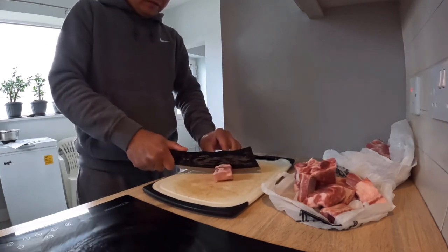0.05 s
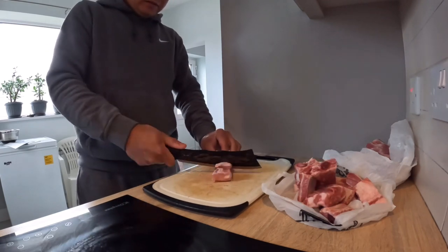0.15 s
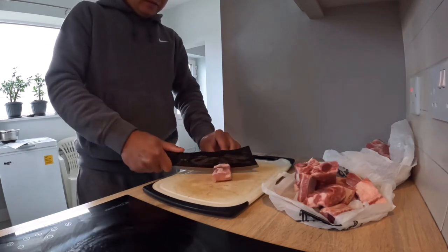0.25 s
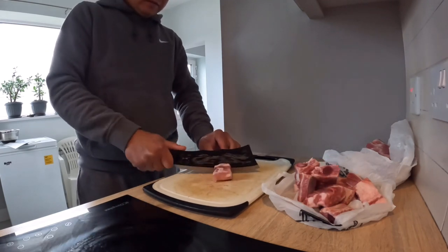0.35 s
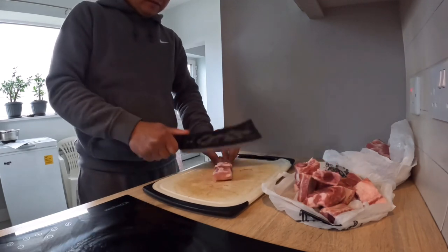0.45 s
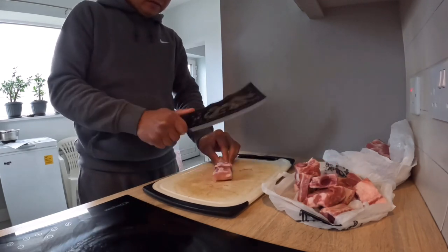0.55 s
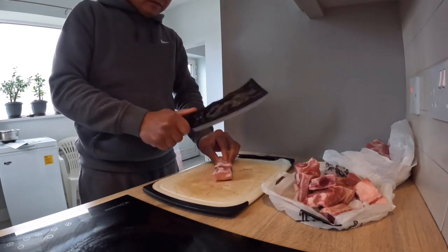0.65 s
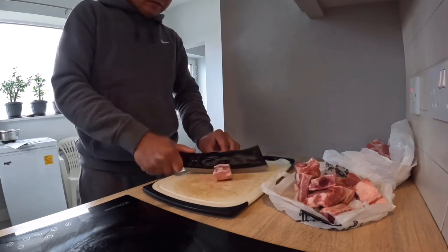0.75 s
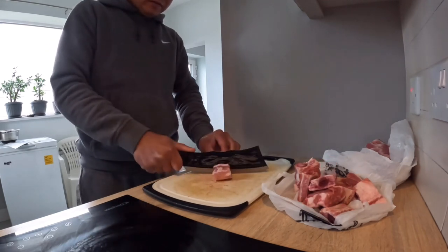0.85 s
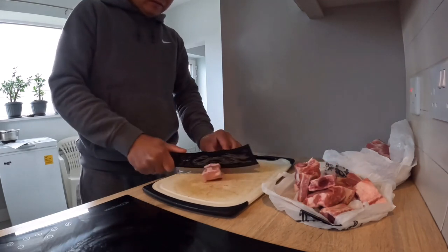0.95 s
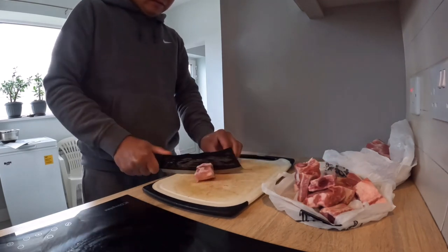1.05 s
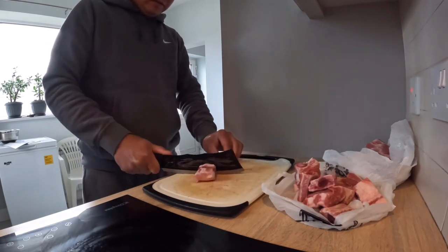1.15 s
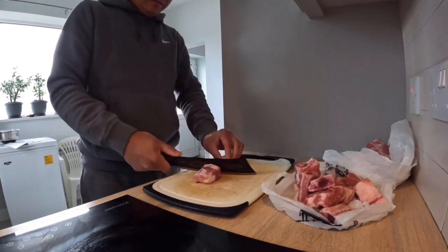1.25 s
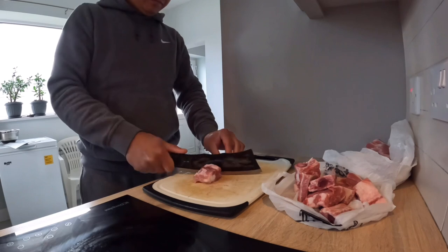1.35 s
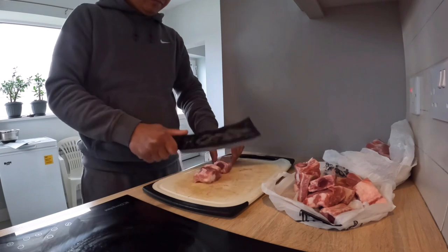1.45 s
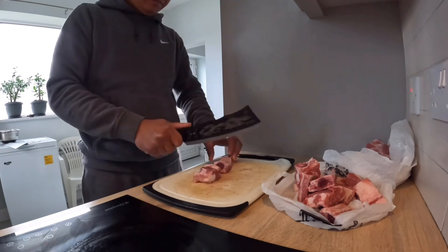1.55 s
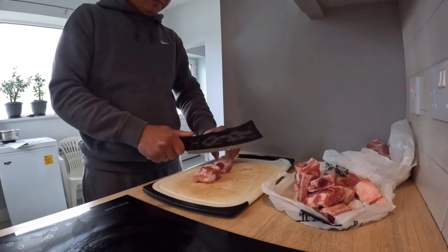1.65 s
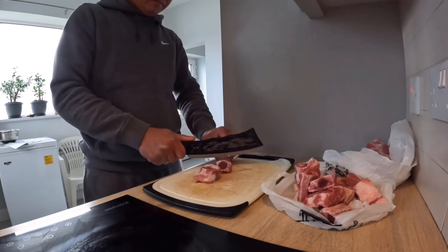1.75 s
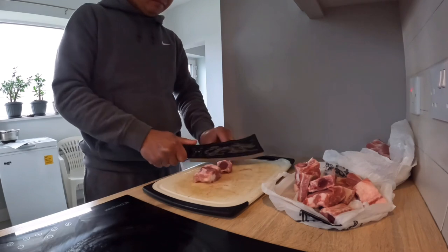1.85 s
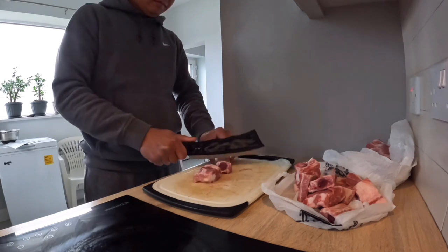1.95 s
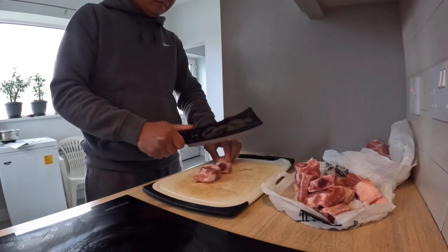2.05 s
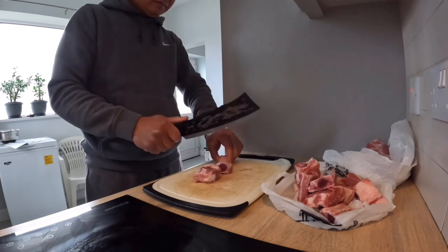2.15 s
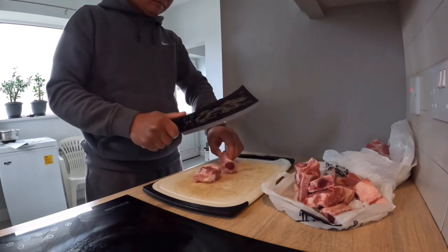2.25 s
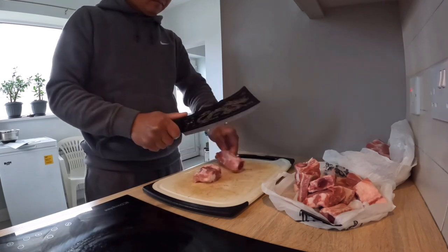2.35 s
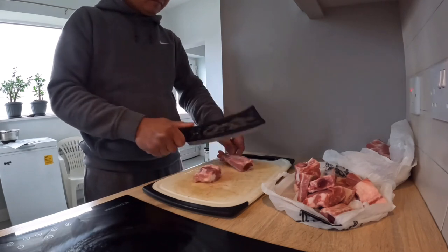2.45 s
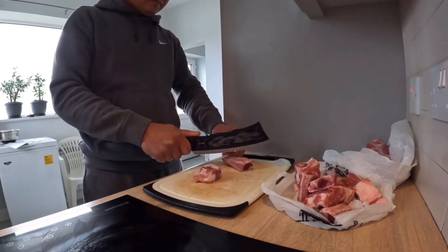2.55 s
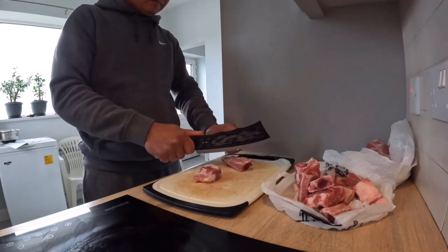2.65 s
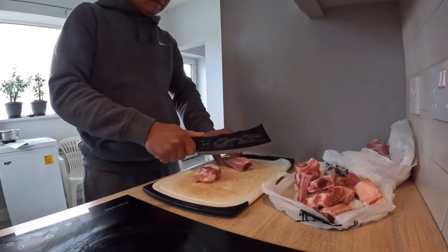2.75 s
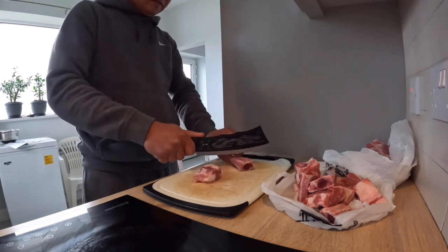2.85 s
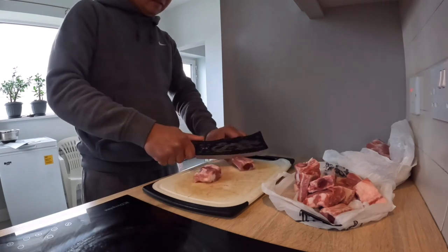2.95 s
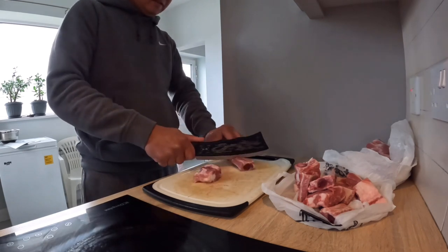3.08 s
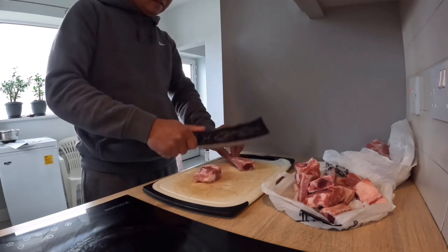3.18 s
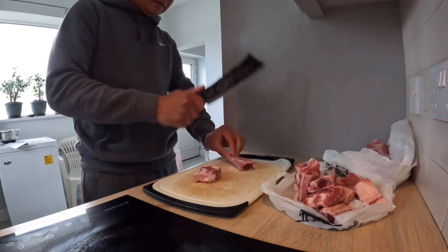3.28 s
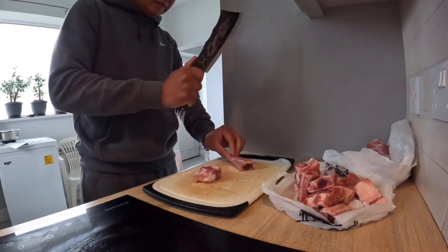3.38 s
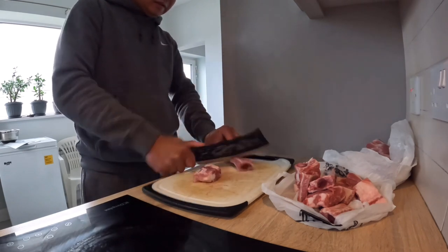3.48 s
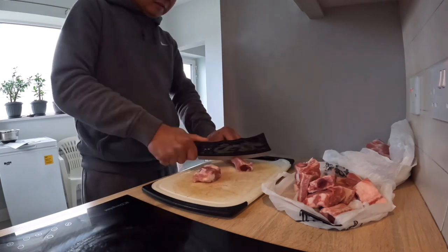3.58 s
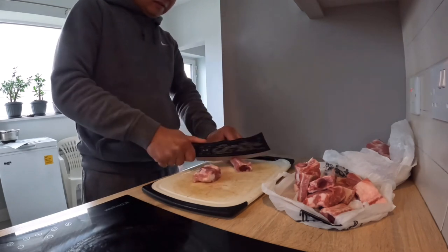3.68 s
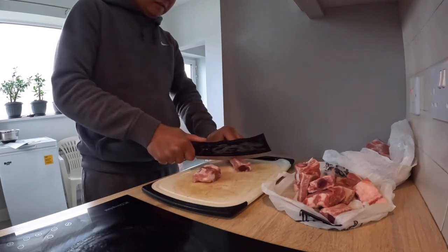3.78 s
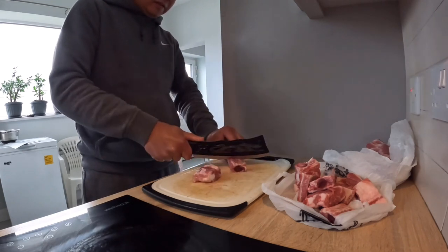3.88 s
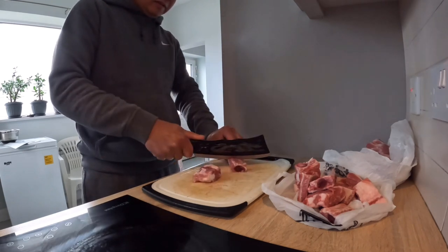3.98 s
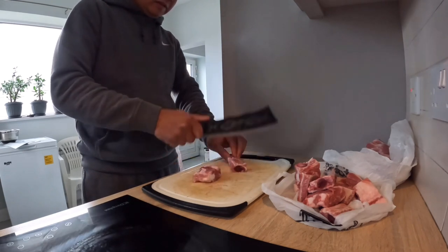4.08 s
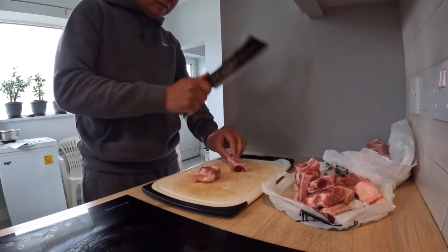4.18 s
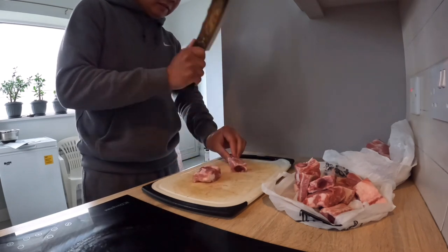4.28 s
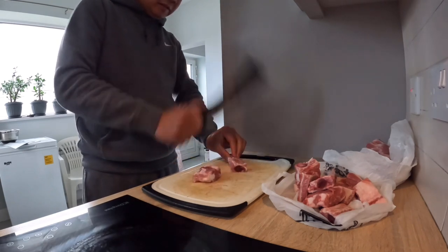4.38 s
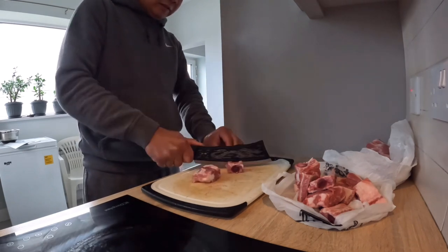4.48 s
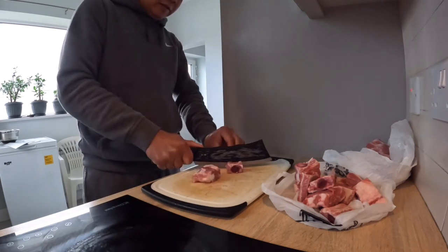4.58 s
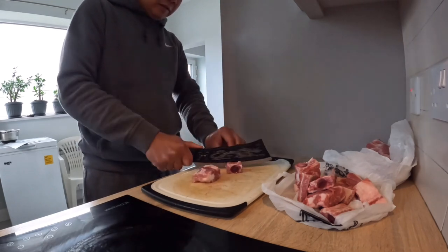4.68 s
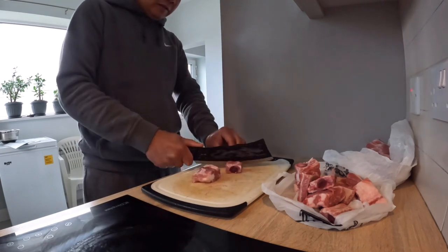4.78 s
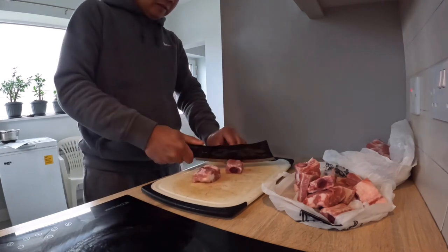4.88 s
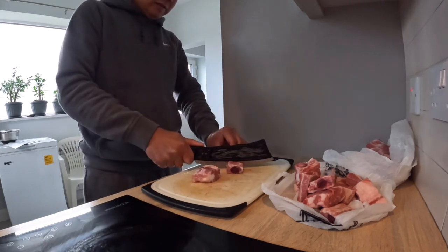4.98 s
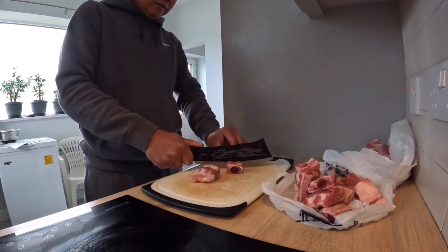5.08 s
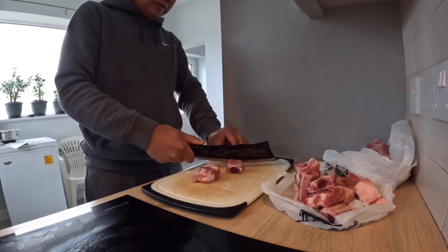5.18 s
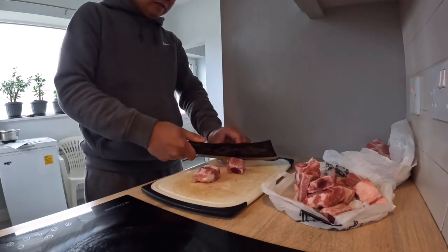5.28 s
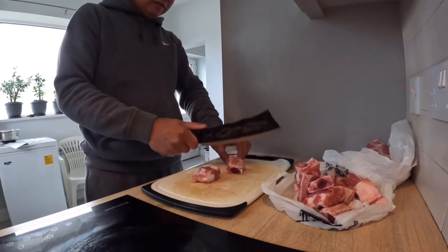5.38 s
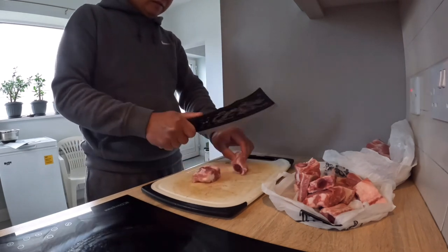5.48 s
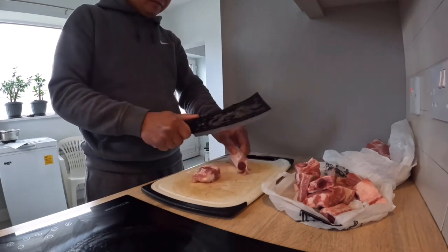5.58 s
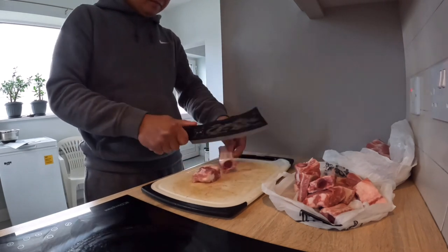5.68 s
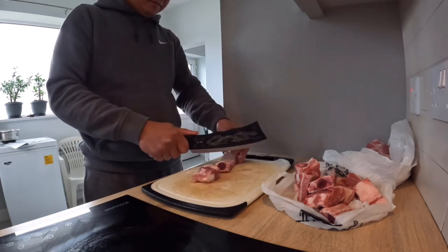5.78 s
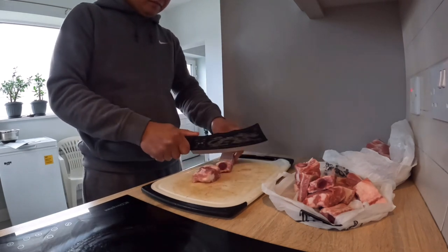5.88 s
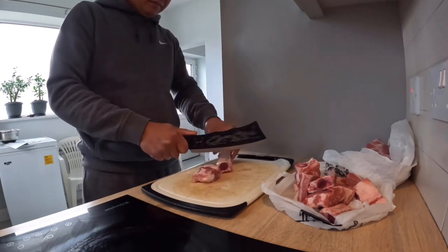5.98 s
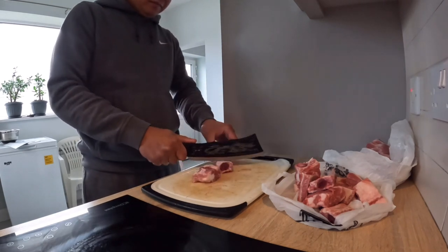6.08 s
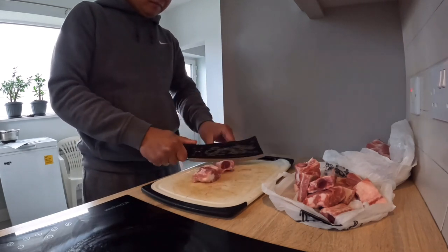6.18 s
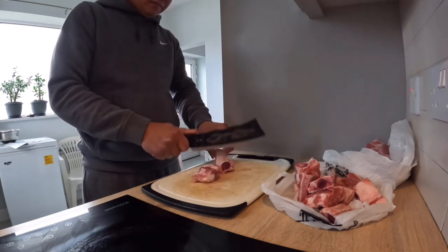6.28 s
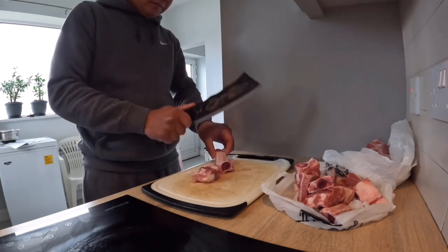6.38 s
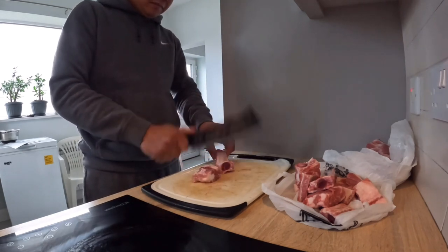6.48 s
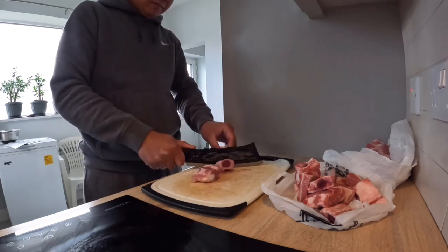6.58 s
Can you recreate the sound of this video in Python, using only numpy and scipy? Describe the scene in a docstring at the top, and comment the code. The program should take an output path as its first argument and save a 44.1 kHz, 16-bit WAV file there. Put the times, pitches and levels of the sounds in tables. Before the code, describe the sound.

A small hard-surfaced kitchen, heard close to the counter in stereo, with a steady dull freezer hum. From 0 to 0.5 seconds, faint wet rustles and ticks of fingers on meat. At 0.8 a heavy cleaver blow cracks, the plastic board knocks, the counter thumps and the room rings briefly; at 1.07 a duller, woody hit with wet handling. A hissing blade scrape swells from 1.1 to 1.8, rising slightly in pitch. Soft low taps at 2.5 and 3.0, with small rustles between. At 3.53 a crisp, drier chop, the board bouncing twice at 3.6 and 3.7. At 4.46 the loudest, brightest bone-splitting crack, with deep thump, rattling echo and two bounces. Near-quiet follows, the hum creeping back; faint taps around 5.8. At 6.56 a last heavy, meaty chop with a deep thump, its tail cut short.

```python
"""First a steady kitchen background with a freezer's hum and small wet rustles; then a cleaver chops meat and bone.
Hum and background are coloured noise; hands, meat and blade touch in short bursts of band-limited noise.
Each blow is a noise crack, a ringing plastic board, a thumping counter and a hard room's echo; the board bounces.
A pushed blade scrapes as moving bands of hiss, and faint copies run just ahead of each blow.
Automatic gain control squeezes the loud tails and lets the background creep back."""
import sys
import numpy as np
from scipy import signal
from scipy.fft import rfft, irfft, next_fast_len
from scipy.io import wavfile
from scipy.ndimage import uniform_filter1d, map_coordinates

SR = 44100
rng = np.random.default_rng(int(sys.argv[2]) if len(sys.argv) > 2 else 0)


def file_out(sig):
    """Save sig as 16-bit WAV at sys.argv[1]."""
    # one column per channel
    cols = np.atleast_2d(sig).T
    # limit, then scale
    lim = np.clip(cols, -1, 1)
    pcm = np.round(lim * 32767).astype(np.int16)
    wavfile.write(sys.argv[1], SR, pcm)


N = 292383  # length [samples]

# Steady background colour: (frequency [Hz], relative level [dB per Hz])
AIR_COLOUR = [(12, -15), (25, -4), (60, 0.5), (92, -0.5), (205, -4), (330, -9.5), (409, -17.5),
              (600, -18.5), (818, -22.5), (1680, -29), (2400, -33.5), (3600, -35.5), (4300, -43.5),
              (7500, -50), (12000, -56.5), (15000, -72.5)]
# Fuzzy lines of the freezer: (centre [Hz], width [Hz], relative level [dB])
FREEZER_LINES = [(97, 40, 0), (200, 30, -4), (315, 35, -8), (474, 32, -10), (580, 40, -15), (904, 70, -18),
                 (1310, 70, -20), (2370, 260, -31)]
# Slow swell and sinking of the background: (time [s], level change [dB])
BACKGROUND_DRIFT = [(0.01, 0.1), (1.0, 0.6), (1.3, 3), (2.3, 2.8), (2.8, 0.7), (3.3, -1), (4.1, -3.5),
                    (5.2, -2), (6.6, -1)]
# Left-right likeness of the background: (frequency [Hz], correlation [-1 to 1])
AIR_LIKENESS = [(60, 0.98), (180, 0.99), (550, 0.79), (1650, 0.77), (4970, 0.46), (15000, 0.18)]
# Left-right likeness of echoes, touches and scrape: (frequency [Hz], correlation [-1 to 1])
ECHO_LIKENESS = [(60, 0.97), (180, 0.78), (550, 0.52), (1650, 0.55), (4970, 0.44), (15000, 0.17)]

# Fingers, meat and blade touch: (time [s], level before the envelope [dB], centre [Hz], t60 [s])
TOUCHES = [(.002, -62, 7000, .3), (.029, -44, 5200, 0.12), (.031, -48, 1900, .05), (.079, -52, 5950, 0.1),
           (.1, -63, 7000, .6), (.143, -59.5, 6000, 0.37), (.21, -61, 8000, .05), (.258, -66, 7000, .04),
           (.27, -64, 7000, .6), (.299, -54, 2300, .1), (.314, -52, 2100, .1), (.327, -57, 4000, .1),
           (.357, -63, 9000, .04), (.41, -58, 6000, .14), (.43, -55.5, 4000, .055),
           (.956, -39, 5560, 0.031), (1.02, -52, 8000, .2), (1.05, -38, 6500, 0.4), (1.082, -37, 5000, .35),
           (1.245, -52, 7500, 0.05), (1.735, -60, 8000, 0.05), (1.76, -62, 7000, 0.04),
           (1.815, -65, 8000, 0.04), (2.07, -61, 5040, .061), (2.803, -58.5, 2480, 0.16),
           (2.828, -48, 1500, .2), (2.838, -57, 3800, .1), (2.916, -53.5, 4750, .06),
           (3.006, -58, 6100, 0.054), (3.469, -53, 4460, .023), (3.488, -45, 3500, .007),
           (3.4935, -49, 6100, .005), (3.535, -48, 8000, .15), (4.415, -62, 5000, .03),
           (5.35, -63, 5000, .04), (5.434, -60, 3500, .04), (5.7, -66, 9000, .03), (6.16, -59, 6900, 0.031),
           (6.564, -36, 6000, .05)]
TOUCH_OCTAVES, TOUCH_RISE = 1.2, 0.012  # width of the band; rise time as a share of t60

# Blows and taps of the blade: (time [s], crack level [dB], crack pitch [ratio], bone share [0-1],
#   contact cut-off [Hz], board knock level [dB], knock dullness [dB per octave], counter thump level [dB],
#   thump dullness [dB per octave], counter ring level [dB], room echo level [dB], echo bone share [0-1],
#   echo cut-off [Hz], tail length [ratio], nearest fore-echo against the blow [dB])
BLOWS = [(.789, -10.5, 1.08, 0.8, 12000, -36, 0.1, -23, .1, -20, -31, .77, 10000, 0.9, -33),
         (.794, 3.5, .96, .2, 6500, -14, 0.1, -1, .1, -2.5, -8.5, .15, 8000, 0.96, -25),
         (1.048, -11, 1.9, .3, 9000, -38, 3, -22, .1, -40, -32, .6, 12000, 0.6, -50),
         (1.0741, -6, 1.0, 0.7, 2000, -1, 2.5, 3, .1, -2, -9.5, .7, 800, 0.5, -46),
         (2.529, -25, .7, .1, 1150, -29, -4, -24, .1, -37, -43, .3, 1500, 0.52, -38),
         (3.01, -27, 0.75, 0.1, 1500, -33, -6, -17, 4, -32, -46, .25, 1600, 0.45, -40.5),
         (3.507, -32, 1.0, .1, 3000, -35, .1, -12, .1, -30, -42, .3, 3000, .5, -40),
         (3.528, 2.5, 1.0, .15, 13000, -17, -1, -10, .1, -10, -22, .6, 4200, 0.95, -15),
         (4.4571, 8, 1.02, 0.95, 15100, -2.5, 0.1, 5, .1, -1, -2.5, .9, 15000, 0.77, -28),
         (5.782, -34, .3, 0.7, 900, -43, 0.1, -18.5, .1, -38, -56, .7, 900, 0.3, -39),
         (5.818, -42, .85, .1, 1400, -52, -3, -38, .1, -56, -63, .35, 1700, 0.3, -38),
         (6.556, 1.84, 1.15, .2, 9000, -10, -1, 3.5, .1, -2, -8, .3, 6000, 0.98, -29)]
# The board drops back on the counter: (time [s], thump level [dB], rattle into the room [dB])
BOUNCES = [(1.002, -20.5, -35), (2.64, -36, -58), (3.265, -37, -58), (3.62, -15, -23), (3.734, -11, -29),
           (4.568, -8, -21), (4.658, -18, -36)]
# Crack colour of a damped cut, before the pitch ratio: (frequency [Hz], relative level [dB per Hz])
FLESH_COLOUR = [(180, -19), (300, -11.5), (1000, -2.5), (1700, 3), (2400, -5.5), (3200, -8), (4200, -13.5),
                (5500, -24), (8000, -32), (12000, -38), (16000, -66)]
# Crack colour of splitting bone, before the pitch ratio: (frequency [Hz], relative level [dB per Hz])
BONE_COLOUR = [(180, -22), (300, -8), (1300, 1.5), (1900, -2), (2350, -11), (3000, -7), (5000, -10.5),
               (7300, -10), (8600, -25), (10500, -17), (13000, -26), (16000, -70.5)]
# Damped resonances of the blade in the crack: (centre [Hz], width [Hz], boost [dB])
BLADE_RESONANCES = [(700, 200, 5), (1300, 250, 3), (1780, 350, 6), (2950, 400, 4), (3900, 400, 3),
                    (6150, 600, 4), (7300, 600, 3), (8700, 900, 4), (10400, 900, 4)]
# Knock of the board: (frequency [Hz], relative level [dB], t60 [s])
BOARD_MODES = [(295, -4.5, .07), (458, -5, .1), (540, -5.5, 0.03), (680, -9, 0.07), (880, -11, 0.04),
               (1260, -8.5, 0.08), (1520, -13, 0.06), (1700, -15, 0.05)]
# First thump of the counter top: (frequency [Hz], relative level [dB], t60 [s])
SLAB_MODES = [(102, -9.5, 0.32), (154, -0.5, 0.18), (125, -11, .05), (197, -23, 0.062)]
# Ring of counter and cupboards: (frequency [Hz], relative level [dB], t60 before the tail ratio [s])
COUNTER_MODES = [(92, -.5, 0.76), (108, -2.5, 0.33), (152, 1.5, .5), (172, -9, 0.8), (205, -8, 0.35),
                 (290.4, -13, 0.55), (460, -17, 0.65), (670, -21, 0.35)]
# Hard room: (frequency [Hz], relative echo level [dB], t60 before the tail ratio [s])
WALLS = [(198, 3, .7), (300, 7, .65), (390, 5, .65), (465, 9, .65), (560, 6.5, .63), (680, 9, .64),
         (800, 1, .65), (1000, 2.5, .66), (1400, 0.1, .68), (1900, -0.6, .68), (2400, 3.5, .62),
         (3300, .5, .57), (4600, .3, 0.62), (8000, 0.6, 0.6), (14000, -3, .45)]
# Lead of the left port for sound from the board: (frequency [Hz], phase [rad])
PORT_LEAD = [(0, -.1), (4570, -1), (8350, -.9), (12000, -1.4), (16000, -1.4)]
# Left over right for sound from the board: (frequency [Hz], level difference [dB])
PORT_TILT = [(60, 0), (150, .3), (380, -1), (950, -.6), (2380, -1), (5980, -1.5), (9000, 1.5), (15000, 1)]
# Time the splintering takes to fall 26 dB: at a 0 dB crack [s], change with level [s per dB]
CRACK_S, CRACK_S_PER_DB = .0048, -.00022
SPLINTER_DB, SPLINTER_S = -17, .016  # fibres go on tearing: start level, time to fall 26 dB [s]
THUMP_DELAY_S = .004  # the bending wave in the counter arrives a little later
FORE_GAP_S, FORE_TOP_HZ = .01067, 8300  # spacing of the fore-echoes; cut-off of their direct part
# Loss from one fore-echo to the one before; extra thump and room level against the crack
FORE_STEP_DB, FORE_THUMP_DB, FORE_ROOM_DB = -12, 10, 3
ECHO_GRAIN_DB = 1.1  # loose things rattle in patches
BOUNCE_SOFT_DB = 10.5  # per octave: a soft landing favours the lowest modes
BOUNCE_BONE, BOUNCE_TOP_HZ = .17, 5000  # colour of the board's rattle: bone share, cut-off

# Blade pushed over the board: (time [s], level [dB])
SCRAPE_PUSH = [(1.07, -60), (1.15, -49), (1.23, -45.5), (1.32, -45), (1.42, -43), (1.5, -44), (1.6, -48),
               (1.7, -52), (1.8, -58), (1.9, -72)]
# Hiss at full colour: (frequency [Hz], relative level [dB per Hz])
SCRAPE_COLOUR = [(880, -28), (1500, -11), (1940, -4.5), (2480, -11.5), (3000, -8), (4100, -16), (5610, -17),
                 (6170, -25), (7530, -18), (8280, -34), (9190, -27), (12600, -31.5), (14100, -40),
                 (14500, -62)]
SCRAPE_HZ, SCRAPE_RISE_HZ_PER_S = 1820, 500  # lowest band at the start and its climb
SCRAPE_TOP_DB, SCRAPE_BRIGHTENS = -42, 0.22  # push of full colour; treble loss per octave per dB less
SCRAPE_UNEVEN_DB = .8  # flutter of the hiss


def amp(db):
    """Level in dB to amplitude."""
    return 10 ** (np.asarray(db) / 20)


def unit(x):
    """Scale to an rms of one."""
    return x / np.sqrt(np.mean(x ** 2) + 1e-20)


def along(points, hz, axis=1):
    """One column of (frequency [Hz], ..) points, interpolated on a log frequency axis."""
    rows = np.array(points)
    return np.interp(np.log(hz + 1), np.log(rows[:, 0] + 1), rows[:, axis])


def resonance(hz, centre, width):
    """Bell of a damped resonance, one at its centre and half at half its width away."""
    return width * width / (4 * (hz - centre) ** 2 + width * width)


def filtered(x, response):
    """Shape the spectrum of x by a response of frequency."""
    m = next_fast_len(x.shape[-1] + 8192)
    spectrum = rfft(x, m) * response(np.fft.rfftfreq(m, 1 / SR))
    return irfft(spectrum, m)[..., :x.shape[-1]]


def pair(size, gain, likeness):
    """Stereo noise with a colour; the mix of mid and side sets the left-right correlation."""
    def mid_and_side(hz):
        turn = np.arccos(np.clip(along(likeness, hz), -1, 1)) / 2
        return gain(hz) * [np.cos(turn), np.sin(turn)]

    mid, side = filtered(rng.standard_normal((2, size)), mid_and_side)
    return unit(np.array([mid + side, mid - side]))


def wobble(rate):
    """A smooth random curve through knots at a rate per second."""
    knots = rng.standard_normal(int(N * rate / SR) + 4)
    return map_coordinates(knots, [np.arange(N) * rate / SR])


def grain(shape, bands, frames):
    """Random patches over frequency and time, smoothed over bands and frames."""
    smooth = uniform_filter1d(rng.standard_normal(shape), size=bands, axis=0)
    return unit(uniform_filter1d(smooth, size=frames, axis=1))


def add(out, s, x):
    """Mix x into out from time s."""
    at = int(round(s * SR))
    out[:, at:at + x.shape[-1]] += x[..., :out.shape[-1] - at]


def kitchen():
    """Steady coloured noise under the freezer's hum, whose lines are fuzzy bands of fluttering noise."""
    def lines(hz):
        return sum(amp(db) * resonance(hz, centre, width) for centre, width, db in FREEZER_LINES)

    air = amp(-42.5 + 0.49 * wobble(7.3)) * pair(N, lambda hz: amp(along(AIR_COLOUR, hz)), AIR_LIKENESS)
    flutter = amp(1.5 * wobble(14))
    freezer = amp(-45.0) * flutter * pair(N, lines, AIR_LIKENESS)
    drift_db = np.interp(np.arange(N) / SR, *np.transpose(BACKGROUND_DRIFT))
    return amp(drift_db) * (air + freezer)


def touches():
    """Short wet rustles and ticks: noise around one pitch that starts fast and dies away."""
    out, t = np.zeros((2, N)), np.arange(SR // 4) / SR
    for s, db, centre, t60 in TOUCHES:
        def band(hz):
            octaves = np.log2((hz + 1) / centre)
            return amp(-6 * (octaves / TOUCH_OCTAVES) ** 2 - 12 * (hz / 14000) ** 6)

        envelope = amp(db - 60 * t / t60) * (1 - np.exp(-t / (TOUCH_RISE * t60)))
        add(out, s, envelope * pair(len(t), band, ECHO_LIKENESS))
    return out


def contact_colour(bone, top_hz, ratio=1):
    """Colour of a contact in dB: between flesh and bone, dull when the contact is soft."""
    def db_at(hz):
        flesh_db = along(FLESH_COLOUR, hz / ratio)
        bone_db = along(BONE_COLOUR, hz / ratio)
        return (1 - bone) * flesh_db + bone * bone_db - 10 * np.log10(1 + (hz / top_hz) ** 4)
    return db_at


def causal(db_at, size=2048):
    """Minimum-phase impulse response of a dB curve: the energy comes as early as it can."""
    cepstrum = irfft(np.log(amp(db_at(np.fft.rfftfreq(size, 1 / SR))) + 1e-6))
    cepstrum[1:size // 2] *= 2  # fold the backward half forward
    cepstrum[size // 2 + 1:] = 0
    return irfft(np.exp(rfft(cepstrum)))[:size // 2]


def crack(db, colour, length):
    """A few ms of splintering noise, coloured by the blade, with a weaker tearing after it."""
    def steel(hz):
        return colour(hz) + sum(boost * resonance(hz, c, w) for c, w, boost in BLADE_RESONANCES)

    t = np.arange(SR // 20) / SR
    envelope = amp(-26 * t / length) + amp(SPLINTER_DB - 26 * t / SPLINTER_S)
    force = rng.standard_normal(len(t)) * envelope
    x = np.convolve(force, causal(steel))
    return amp(db) * x / np.abs(x).max()


def ring(modes, db, rise, wander=0, soft_db=0, length=1, pivot_hz=100):
    """Decaying modes; the phase wanders where loose parts rattle along, a soft contact favours the lowest."""
    t = np.arange(SR) / SR
    walk = np.cumsum(rng.standard_normal((len(modes), SR)), axis=1)
    drift = uniform_filter1d(walk, size=400) * wander / np.sqrt(SR)
    x = np.zeros(SR)
    for (hz, level, t60), phase in zip(modes, drift):
        level_db = level - soft_db * np.log2(hz / pivot_hz) - 60 * t / t60 / length
        x += amp(level_db) * np.sin(2 * np.pi * hz * t + phase)
    return amp(db) * x * (1 - np.exp(-t / rise))


def echo(db_at, build_up, length):
    """A fresh tail of room and rattling things: every band dies at its own speed."""
    noise = pair(SR, lambda hz: amp(db_at(hz) + along(WALLS, hz)), ECHO_LIKENESS)
    hz, t, z = signal.stft(noise, SR, nperseg=256)
    decay_db = 60 * t / length / along(WALLS, hz, axis=2)[:, None]
    grain_db = ECHO_GRAIN_DB * grain(z.shape[1:], bands=3, frames=3)
    tail = signal.istft(z * amp(grain_db - decay_db), SR, nperseg=256)[1][:, :SR]
    return tail * (1 - np.exp(-np.arange(SR) / SR / build_up))


def fore_echoes(near, far, s, fore_db, direct, room):
    """Two faint copies ahead of a blow, the earlier one weaker; only their direct part is dulled."""
    dull = signal.sosfilt(signal.butter(6, FORE_TOP_HZ, fs=SR, output="sos"), direct)
    for k in range(2):
        at, db = s - (k + 1) * FORE_GAP_S, fore_db + k * FORE_STEP_DB
        add(near, at, amp(db) * dull)
        add(far, at, amp(db + FORE_ROOM_DB) * room)


def from_board(near):
    """Place direct sound by a level and phase difference between the left and right port."""
    side = np.array([[.5], [-.5]])

    def response(hz):
        lead = np.interp(hz, *np.transpose(PORT_LEAD))
        return amp(side * along(PORT_TILT, hz)) * np.exp(1j * side * lead)
    return filtered(near, response)


def cleaver():
    """Each contact cracks and knocks the board, the counter thumps and rings, the room answers; the board bounces."""
    near, far = np.zeros((2, 2, N))
    for (s, crack_db, ratio, bone, top_hz, knock_db, soft_db, thump_db, thump_soft_db,
         ring_db, echo_db, echo_bone, echo_hz, tail, fore_db) in BLOWS:
        blow, thump = np.zeros((2, 1, SR))
        crack_s = CRACK_S + CRACK_S_PER_DB * crack_db  # longer for light taps
        add(blow, 0, crack(crack_db, contact_colour(bone, top_hz, ratio), crack_s))
        add(blow, 0, ring(BOARD_MODES, knock_db, rise=0.00079, wander=16, soft_db=soft_db, pivot_hz=600))
        slab = ring(SLAB_MODES, thump_db, rise=0.002, soft_db=thump_soft_db, pivot_hz=125)
        add(thump, THUMP_DELAY_S, slab)
        add(near, s, blow + thump)
        room_colour = contact_colour(echo_bone, echo_hz, ratio ** 0.4)
        room = amp(echo_db) * echo(room_colour, build_up=0.014, length=tail)
        add(far, s + 0.0018, room)
        fore_echoes(near, far, s, fore_db, blow + amp(FORE_THUMP_DB) * thump, room)
        add(near, s + THUMP_DELAY_S, ring(COUNTER_MODES, ring_db, rise=0.02, wander=9.6, length=tail))
    for s, db, rattle_db in BOUNCES:
        add(near, s, ring(COUNTER_MODES, db, rise=0.0054, wander=5.6, soft_db=BOUNCE_SOFT_DB))
        rattle = echo(contact_colour(BOUNCE_BONE, BOUNCE_TOP_HZ), build_up=0.04, length=0.85)
        add(far, s, amp(rattle_db) * rattle)
    return far + from_board(near)


def scrape():
    """Hiss of the sliding blade; brighter when pushed harder, its low bands climb as the blade tilts."""
    s, push_db = np.transpose(SCRAPE_PUSH)
    noise = pair(N, lambda f: amp(along(SCRAPE_COLOUR, f)), ECHO_LIKENESS)
    hz, t, z = signal.stft(noise, SR, nperseg=512)
    low_hz = SCRAPE_HZ + SCRAPE_RISE_HZ_PER_S * (t - s[0])
    bands = sum(np.exp(-((hz[:, None] - k * low_hz) / 150) ** 2) for k in (1, 1.55))
    patches = grain(z.shape[1:], bands=6, frames=8)
    level_db = np.interp(t, s, push_db, left=-140, right=-140)
    treble_db = SCRAPE_BRIGHTENS * (level_db - SCRAPE_TOP_DB) * np.log2(1 + hz[:, None] / 3000)
    shaped = z * amp(3.5 * bands + 0.9 * patches + level_db + treble_db)
    hiss = signal.istft(shaped, SR, nperseg=512)[1][:, :N]
    return hiss * amp(SCRAPE_UNEVEN_DB * wobble(25))


def scene():
    """Background, touches, blows and scrape together."""
    return kitchen() + touches() + cleaver() + scrape()


def gain_control(x, limit_db, attack, release, lag, calm_db, depth_db, knee_db, memory, size=64):
    """A quick stage holds loud tails near a limit; a slow stage turns down after loud moments and creeps back."""
    step, smooth = size / SR, .008  # control step and level smoothing [s]
    power = uniform_filter1d((x ** 2).mean(0), size)[::size]
    power = signal.lfilter([step / smooth], [1, step / smooth - 1], power)
    level = 10 * np.log10(np.abs(power) + 1e-12)
    quick, loud, slow, gain = 0, 0, 0, []  # all in dB
    for db in level:
        want = min(0, limit_db - db - slow)
        quick += (want - quick) * min(1, step / (attack if want < quick else release))
        loud = max(loud * np.exp(-step / memory), db - calm_db)
        slow += (-depth_db * np.tanh(loud / knee_db) - slow) * step / 0.12
        gain.append(quick + slow)
    gain_at = np.arange(len(gain)) * size + lag * SR  # acts a little late
    return x * amp(np.interp(np.arange(N), gain_at, gain))


def record(dry):
    """Gain control that reacts a little late, bass cut, soft clipping, band limit."""
    x = gain_control(dry, limit_db=-22.5, attack=0.011, release=0.038, lag=0.0069,
                     calm_db=-23, depth_db=11, knee_db=5, memory=0.45)  # times in s
    x = signal.sosfilt(signal.butter(2, 65, "high", fs=SR, output="sos"), x)
    x = x / (1 + np.abs(x) ** 6) ** (1 / 6)
    return filtered(x, lambda hz: hz < 16400)


dry = scene()
out = record(dry)
file_out(out)
```